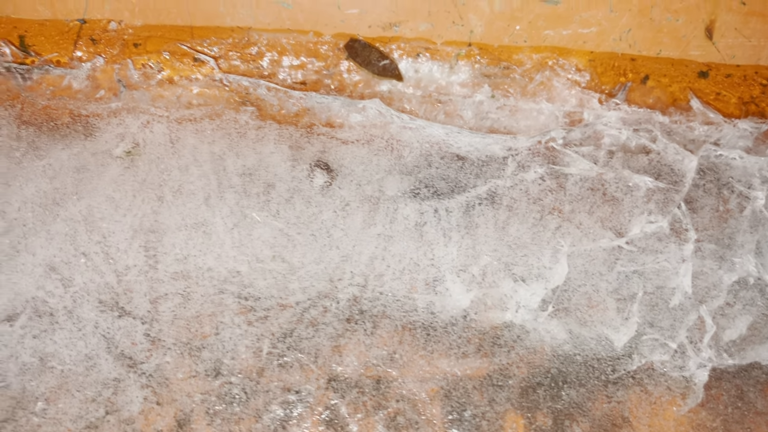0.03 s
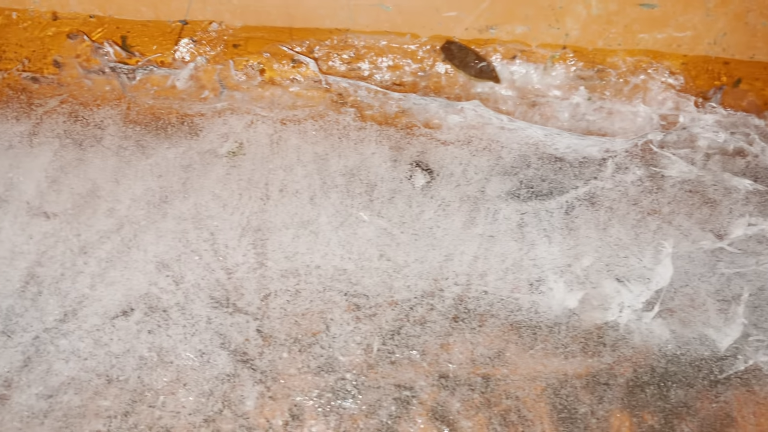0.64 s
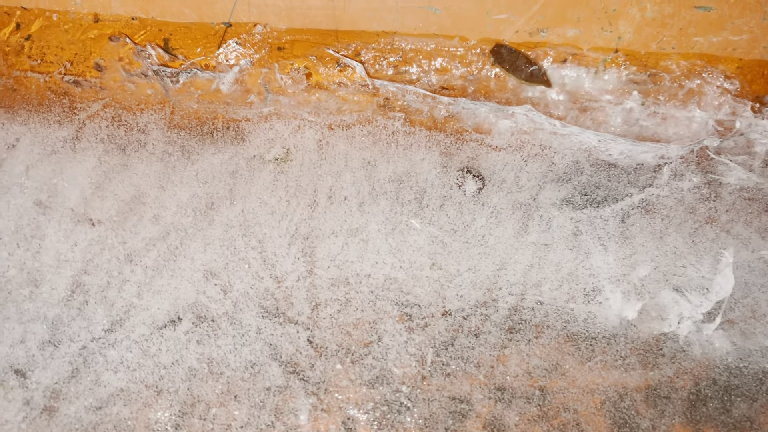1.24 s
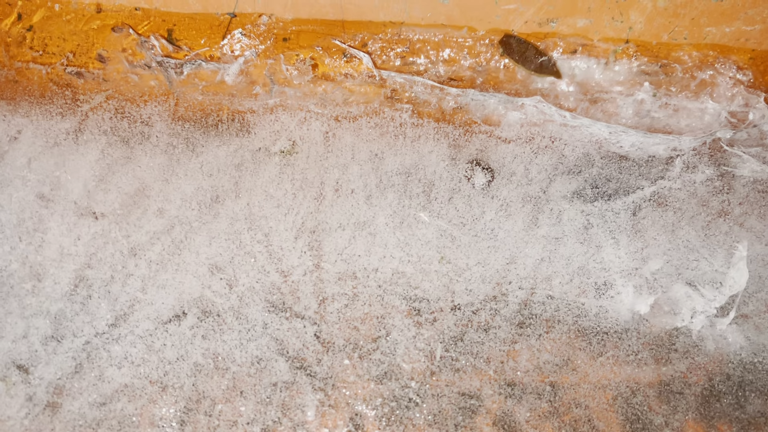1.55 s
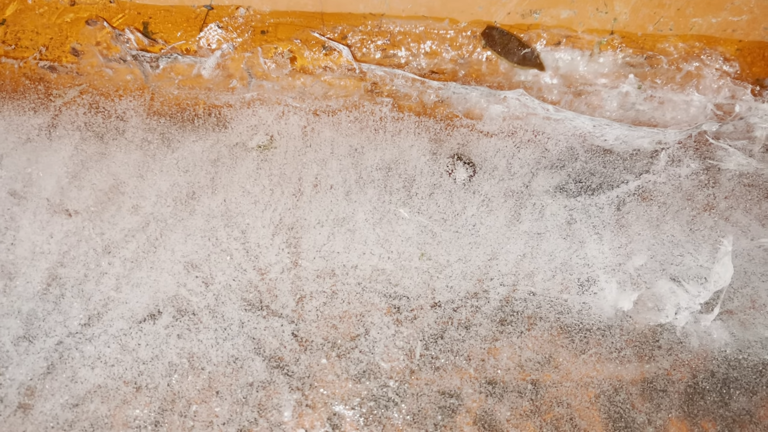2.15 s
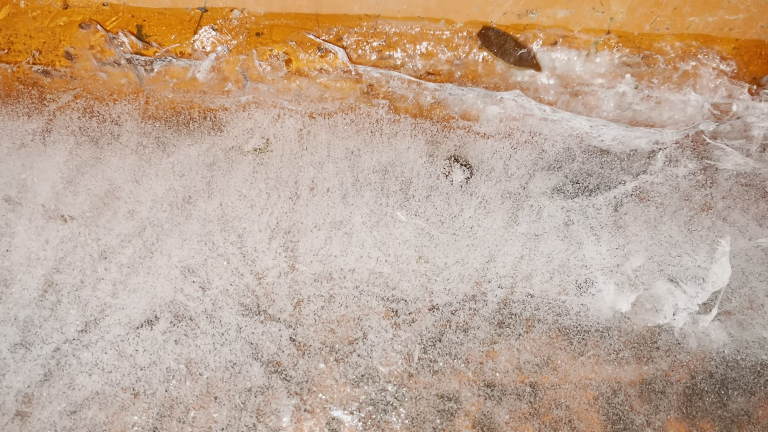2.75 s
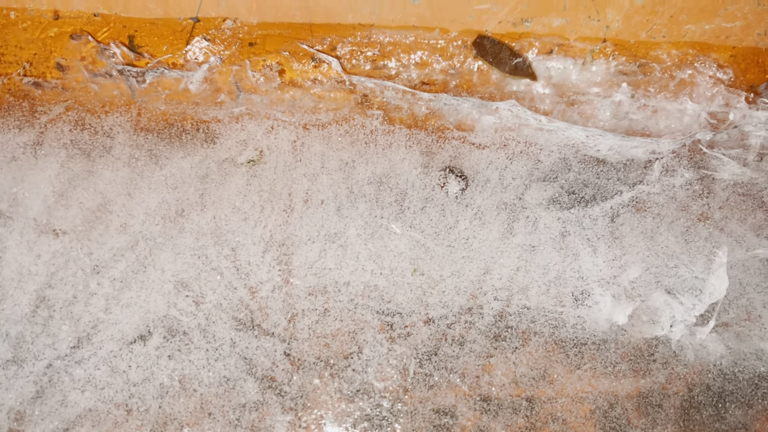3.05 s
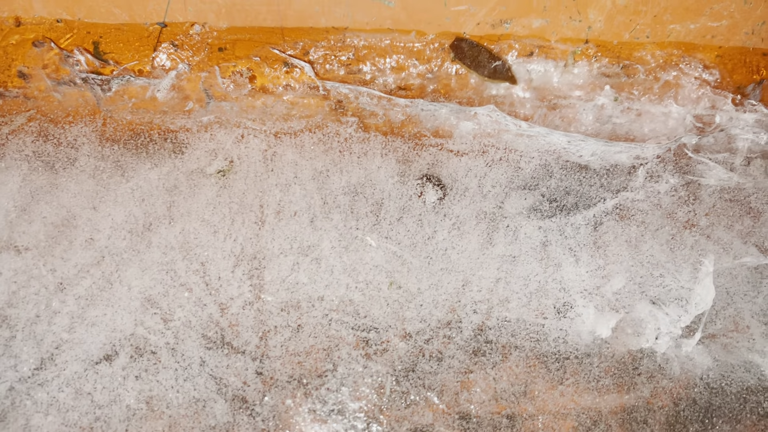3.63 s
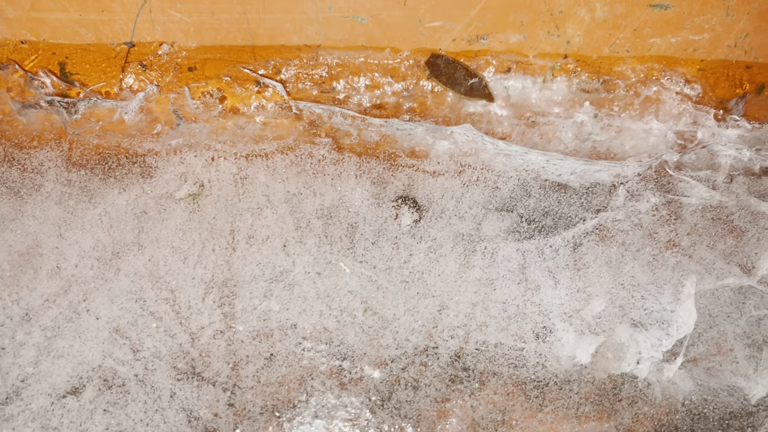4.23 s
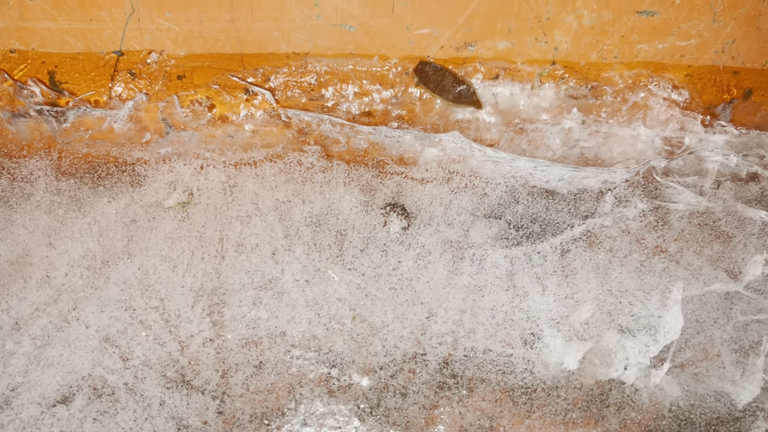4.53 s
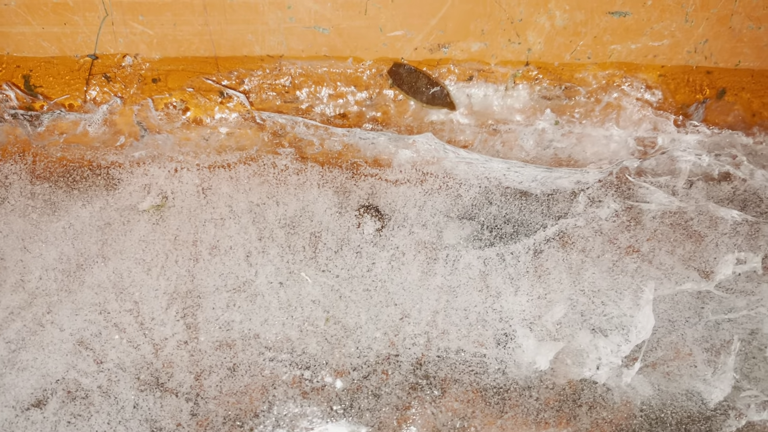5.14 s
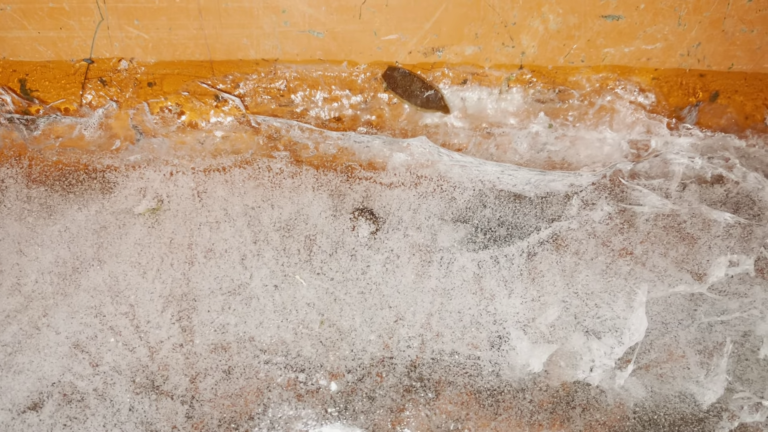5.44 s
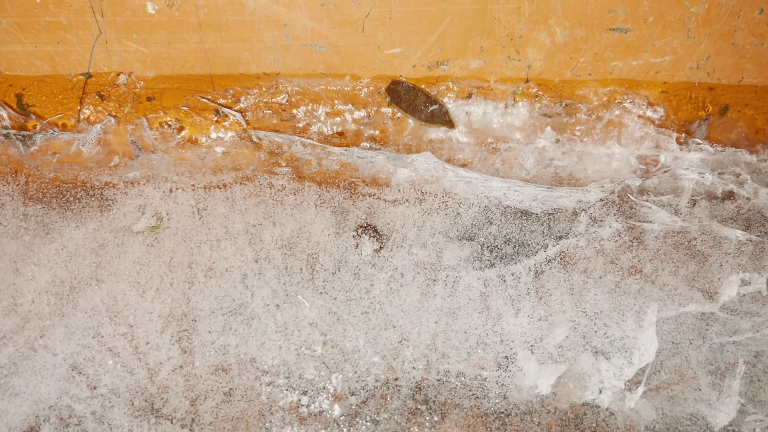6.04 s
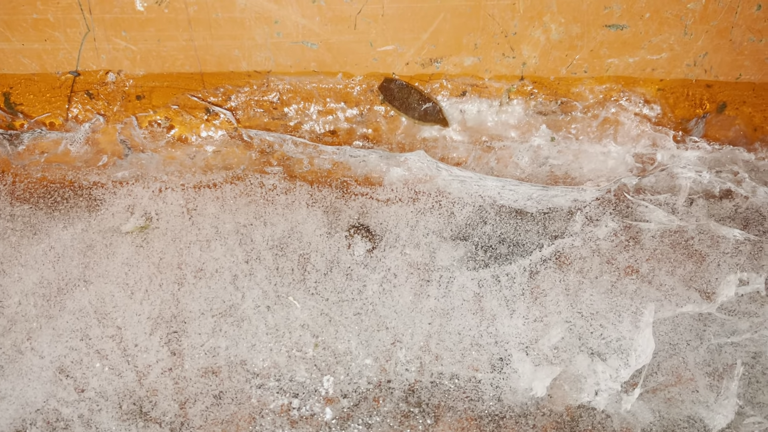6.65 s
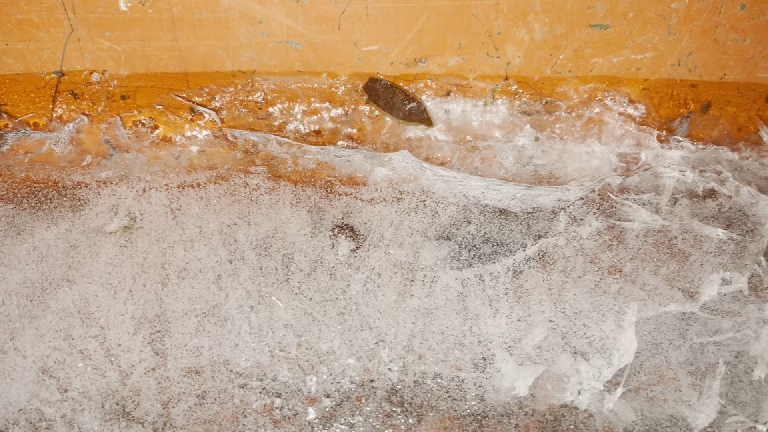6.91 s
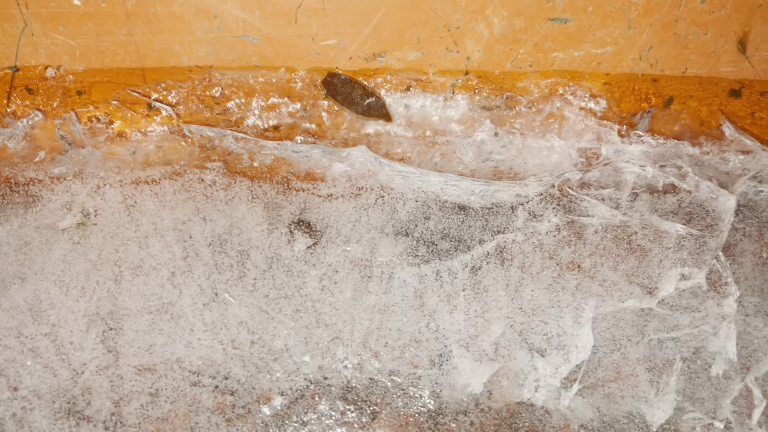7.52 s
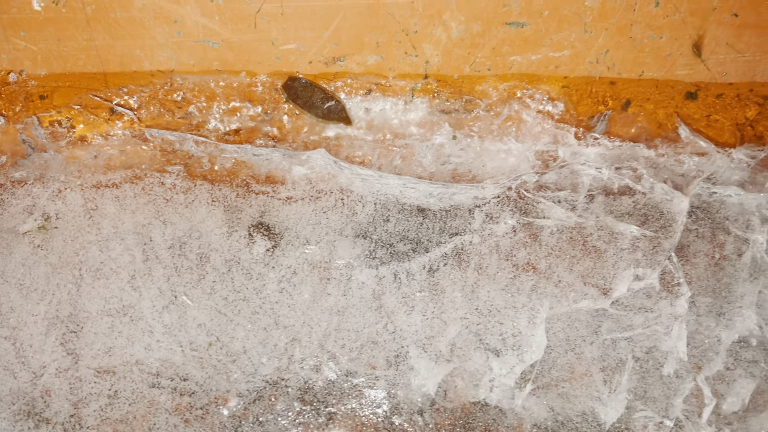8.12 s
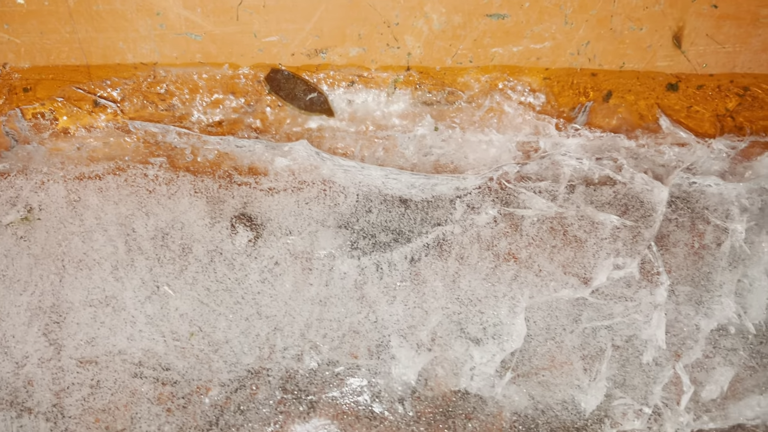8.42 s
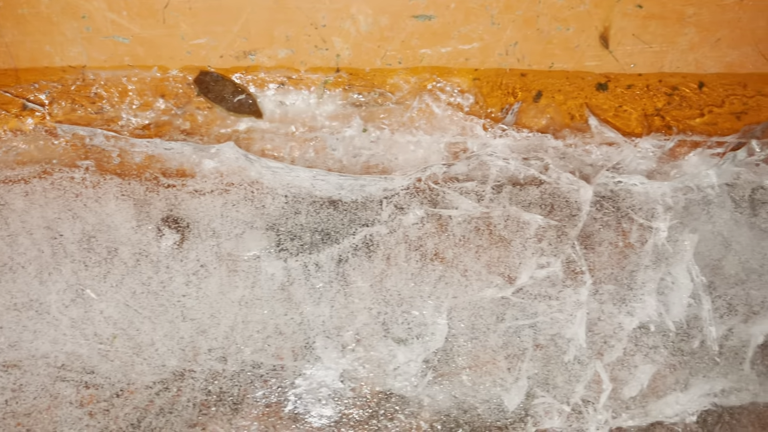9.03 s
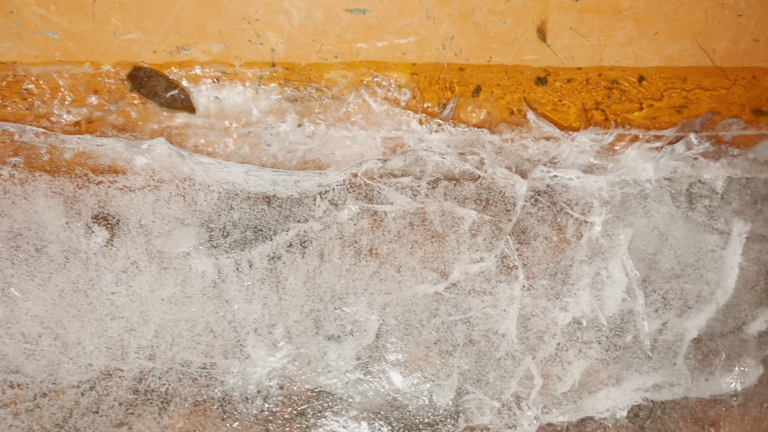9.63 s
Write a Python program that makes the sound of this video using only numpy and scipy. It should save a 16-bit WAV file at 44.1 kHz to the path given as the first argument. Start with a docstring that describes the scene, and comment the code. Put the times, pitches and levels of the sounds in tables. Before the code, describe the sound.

Ice freezing on a steel plate cracks and ticks irregularly with a short metallic ring, over a faint low rumble of distant engines.

```python
"""Outdoors, close to a painted steel plate on which ice is freezing.
Each crack is a short burst of slips that sets the plate ringing; loose flakes of frost tick without
ringing it. There is one faint rustle and a few soft, hollow knocks.
Far away, engines drone and a machine whines over the low rumble of traffic and a faint hiss."""
import sys
import numpy as np
from scipy import signal
from scipy.fft import rfft, irfft, next_fast_len
from scipy.io import wavfile
from scipy.ndimage import uniform_filter1d

SR = 44100
rng = np.random.default_rng(int(sys.argv[2]) if len(sys.argv) > 2 else 0)


def log_audio(samples):
    """Write samples as a 16-bit WAV file to the path given in sys.argv[1]."""
    # one column per channel
    frames = np.atleast_2d(samples).T
    # limit to full scale, then quantise
    limited = np.clip(frames, -1, 1)
    pcm = np.round(limited * 32767).astype(np.int16)
    wavfile.write(sys.argv[1], SR, pcm)


N = 430857
TIME = np.arange(N) / SR


def from_db(db):
    """Turn decibels into a number to multiply a sound by."""
    return 10 ** (np.asarray(db) / 20)


def unit_power(x):
    """Scale a sound so that its average power is 1."""
    return x / np.sqrt(np.mean(x ** 2) + 1e-20)


def over_time(points):
    """Join (time, value) points with straight lines, giving one value per sample."""
    return np.interp(TIME, *np.transpose(points))


def at_hz(points, hz):
    """Read between (frequency, value) points, with all octaves equally wide."""
    known_hz, values = np.transpose(points)
    return np.interp(np.log(hz), np.log(known_hz), values)


def ramp(start_s, length_s):
    """Rise evenly from 0 to 1."""
    return np.clip((TIME - start_s) / length_s, 0, 1)


def swell(start_s, rise_s, hold_s, fall_s):
    """Fade in, hold, then fade out."""
    return ramp(start_s, rise_s) * (1 - ramp(start_s + rise_s + hold_s, fall_s))


def add(out, start_s, sound):
    """Mix a sound in at the given time."""
    i = int(start_s * SR)
    out[:, i:i + sound.shape[1]] += sound[:, :N - i]


def band(x, low_hz, high_hz):
    """Keep the part of a sound between two frequencies."""
    edges = [low_hz, min(high_hz, .45 * SR)]
    return signal.sosfilt(signal.butter(2, edges, "band", fs=SR, output="sos"), x)


# how much louder the left side is than the right: f/Hz, level/dB
LEFT_LEAD = [(50, 1), (110, 2.5), (190, 5), (400, 1.5), (1200, 1.2), (2500, 2), (4500, 5), (8000, 2),
             (14000, -2)]
def balance(hz):
    """How strongly each side hears this frequency."""
    return from_db(at_hz(LEFT_LEAD, hz) * np.array([[.5], [-.5]]))


def stereo_noise(spectrum, likeness, size):
    """Shaped noise; likeness 1 makes left and right alike, 0 unrelated, -1 opposite."""
    hz = np.maximum(np.fft.rfftfreq(size, 1 / SR), 1)
    mid, side = rfft(rng.standard_normal((2, size)))
    alike = np.clip(at_hz(likeness, hz), -1, 1)
    pair = np.sqrt((1 + alike) / 2) * mid + np.sqrt((1 - alike) / 2) * side * [[1], [-1]]
    fade_past_ends = (np.minimum(hz / spectrum[0][0], 1) * np.minimum(spectrum[-1][0] / hz, 1)) ** 2
    return irfft(pair * balance(hz) * fade_past_ends * from_db(at_hz(spectrum, hz)), size)


# the tone of each of three background noises: f/Hz, relative level/dB
RUMBLE_TONE = [(20, -28), (30, -21.5), (45, -7), (62, 0.5), (90, 2), (140, 1), (175, -0.5), (220, -10.5),
               (300, -19.5), (500, -53.5)]
MURMUR_TONE = [(100, -21.5), (280, 0), (400, 2), (520, -12), (800, -18.5), (1300, -26.5), (2500, -43.5)]
HISS_TONE = [(500, 11.5), (1200, 5.5), (2500, 2.5), (5000, -.5), (7000, -1), (9000, 2), (11800, -2.5),
             (12800, -13.5), (14000, -39.5)]
# how alike the background is on the left and right: f/Hz, likeness
AIR_LIKENESS = [(60, 0.91), (130, 1), (250, 0.31), (500, 0.42), (1200, .45), (5000, 0.23), (8400, 0.85),
                (12000, 0.77)]
def air(rumble_db=-49.5, murmur_db=-73.0, hiss_db=-86.0):
    """Far traffic rumbles and murmurs under a faint, even hiss."""
    out = np.zeros((2, N))
    for tone, db in [(RUMBLE_TONE, rumble_db), (MURMUR_TONE, murmur_db), (HISS_TONE, hiss_db)]:
        noise = stereo_noise(tone, AIR_LIKENESS, next_fast_len(N, True))[:, :N]
        out += from_db(db) * unit_power(noise)
    return out


def hum(hz, level_db):
    """One pure note of a far engine, following a changing pitch."""
    cycles = np.cumsum(hz) / SR + rng.random()
    return np.sqrt(2) * from_db(level_db) * np.sin(2 * np.pi * cycles) * balance(np.mean(hz))


# how fast the steady engine fires: t/s, f/Hz
FIRING_RATE = [(0, 96.7), (1.2, 93.5), (3, 94.3), (5.6, 95.3), (7.2, 94.4), (9.77, 96.7)]
# how loud its lowest note is: t/s, level/dB
LOW_NOTE_LEVEL = [(0, -74.5), (1.2, -65.5), (5, -49.5), (7.4, -52), (9.77, -50.5)]
# how loud the note an octave higher is: t/s, level/dB
OCTAVE_LEVEL = [(0, -55), (.6, -66.5), (2.3, -69), (2.9, -54.5), (4.4, -52), (5, -58.5), (6.3, -46),
                (7.4, -58.5), (9.77, -64)]
def steady_engine(third_vs_octave_db=-18.5):
    """A far engine drones at 1, 2 and 3 times its firing rate; the top two notes swell together."""
    hz = over_time(FIRING_RATE)
    low_db, octave_db = over_time(LOW_NOTE_LEVEL), over_time(OCTAVE_LEVEL)
    return hum(hz, low_db) + hum(2 * hz, octave_db) + hum(3 * hz, octave_db + third_vs_octave_db)


# the plate's longest note; a "ring" time is how long a sound takes to fade by 60 dB
LONG_NOTE_HZ, LONG_RING_S = 1857, 1.6
def lingering_ring(start_db=-81):
    """The plate's longest note is still dying away at the start."""
    fade = from_db(start_db - 60 * TIME / LONG_RING_S)
    return fade * np.sin(2 * np.pi * LONG_NOTE_HZ * TIME) * balance(LONG_NOTE_HZ)


def rustle(hz=1076, octaves=.3, level_db=-86):
    """A faint, hollow rustle: a narrow band of noise that swells once."""
    edge_ratio = 2 ** (octaves / 2)
    noise = unit_power(band(rng.standard_normal((2, N)), hz / edge_ratio, hz * edge_ratio))
    return from_db(level_db) * noise * swell(start_s=.38, rise_s=.088, hold_s=.29, fall_s=.22)


# how hard a crack shakes the plate: f/Hz, level/dB for an average crack, share of its body added
CRACK_PUSH = [(1150, -12.5, 0.79), (1600, -13, 1), (3800, -5, .8), (9000, 0, 0.05)]
def push_db(hz, body_db):
    """The more body (fullness) a crack has, the harder it drives the plate's lower notes."""
    known_hz, average_db, share = np.transpose(CRACK_PUSH)
    return np.interp(np.log(hz), np.log(known_hz), average_db + share * body_db)


# the plate's crowd of weak notes, which blur into noise: f/Hz, relative level/dB
CROWD_TONE = [(250, -5), (450, -6.5), (750, -11.5), (1000, -2), (1150, 5), (1400, -2), (1800, 5),
              (2250, -2), (2650, -5), (6000, -4.5), (8700, -2.5), (11500, 4.5), (13000, -23.5),
              (14500, -45.5)]
# how alike the plate sounds on the left and right: f/Hz, likeness
PLATE_LIKENESS = [(300, .3), (650, -0.096), (1300, -0.6), (2600, 0.91), (5000, 0.89), (7000, 0.84),
                  (8400, .93), (12000, 0.6)]
# how long the plate rings: f/Hz, ring time/s
RING_TIMES = [(300, 1), (1100, 0.57), (2000, 0.35), (3500, 0.25), (6000, 0.22), (9000, 0.18),
              (12000, 0.087), (15000, .07)]
# the plate's clear notes: f/Hz, relative level/dB
CLEAR_NOTES = [(271, -16), (312, -20), (380, -21), (432, -22), (829, -21), (1108, -10), (1128, -6),
               (1581, -10), (1648, -12), (1681, -11), (1708, -11), (1857, -9), (1893, -12), (1917, -8),
               (1990, -9), (2590, -4), (2619, -6), (2650, -10), (2881, -11), (3158, -11), (3204, -12),
               (3500, -13), (3704, -12), (3802, -13), (4132, -13), (4863, -14), (5726, -15), (8660, -7),
               (8755, -6), (8876, -9)]
def plate_ring(body_db, clear_db, crowd_db=9.5, notes_db=-1.0, long_note_db=-35, rise_s=.0007):
    """After a crack the plate shakes at its own natural notes; the high ones die first."""
    size = 32768
    t = np.arange(size) / SR
    hz = np.maximum(np.fft.rfftfreq(size, 1 / SR), 1)
    crowd = rfft(stereo_noise(CROWD_TONE, PLATE_LIKENESS, size))
    crowd *= from_db(crowd_db + push_db(hz, body_db))
    centres_hz, ring_times = np.transpose(RING_TIMES)
    out = np.zeros((2, size))
    # split the crowd into bands so that each fades at its own speed
    for one_band, ring_s in zip(np.eye(len(centres_hz)), ring_times):
        share = np.interp(np.log(hz), np.log(centres_hz), one_band)
        out += irfft(crowd * share) * from_db(-60 * t / ring_s)
    notes = [(note_hz, db, .86 * at_hz(RING_TIMES, note_hz)) for note_hz, db in CLEAR_NOTES]
    for note_hz, db, ring_s in notes + [(LONG_NOTE_HZ, long_note_db, LONG_RING_S)]:
        # each crack meets the note's pattern of movement at a different spot
        chance_db = rng.normal(0, 2.5)
        strength = from_db(notes_db + clear_db + db + push_db(note_hz, body_db) + chance_db)
        phase = rng.uniform(0, 2 * np.pi) + rng.normal(0, .71, (2, 1))
        swing = np.sin(2 * np.pi * note_hz * t + phase)
        out += strength * balance(note_hz) * swing * from_db(-60 * t / ring_s)
    return out * (1 - np.exp(-t / rise_s))


def snap(body_db, rise_s=.00074, fade_s=.0019, size=1024):
    """The ice breaks in uneven slips for a few milliseconds: a bright sound straight from the ice."""
    t = np.arange(size) / SR
    low_db, middle_db = push_db([1600, 3800], body_db)
    tone = [(700, low_db - 9), (1500, low_db + 7.5), (3800, middle_db - 6.5),  # f/Hz, level/dB
            (8500, 6.5), (12000, 4.0), (13500, -15.5), (15500, -20.5)]
    slips_db = unit_power(uniform_filter1d(rng.standard_normal(size), size=16))
    burst = np.exp(-t / fade_s) * (1 - np.exp(-t / rise_s))
    return stereo_noise(tone, PLATE_LIKENESS, size) * from_db(slips_db) * burst


def hairline_cracks(per_s=.8, treble_db=-89, spread_db=4, snap_db=19):
    """Tiny, faint cracks at random moments, as extra rows for the table below."""
    draws = rng.random((round(per_s * N / SR), 2))
    return [(when * N / SR, treble_db + spread_db * (2 * size - 1), 0, snap_db) for when, size in draws]


# cracks in the ice: t/s, treble level/dB, body/dB above average, snap/dB above treble before its boost
ICE_CRACKS = [(0.396, -71.5, -4.5, 1), (0.414, -73, -8.5, 13), (0.739, -71, -13, -5), (1.303, -79, -8, 6),
              (1.6289, -57, 3, 10.5), (1.905, -82, -1.5, 11), (3.323, -76.5, -1, 14), (3.3794, -64.5, 3, 6),
              (3.596, -70, -4.5, 6), (3.881, -78.5, -4, 10), (4.1258, -73.5, -3, -3),
              (4.243, -44.5, 2.5, 6.5), (5.1994, -81.5, 3, 15.5), (5.634, -74.5, 0, 9), (5.657, -73, -5, 5),
              (5.7022, -58.5, -0.5, 10), (5.8181, -32, 13, 13.5), (5.9768, -47, -9, -2),
              (6.1353, -27.5, 3, 12.5), (6.5268, -54, -2.5, 7.5), (6.89, -70, -2, 2.5),
              (6.9556, -79, -4, 9), (7.1447, -79.5, -4, 9), (7.3065, -54.5, 2, -12.5),
              (7.3478, -54.5, 7.5, -4), (7.3845, -57.5, 1, 9), (8.5012, -60.5, -8.5, 7),
              (8.6008, -74.5, 4, 15), (9.3922, -48.5, -4.5, -3.5), (9.4385, -59.5, 9.5, 10),
              (9.52, -64, -1.5, 12.5), (9.5755, -66, -8, 6), (9.616, -66.5, 0, 7)]
def cracks(snap_boost_db=5.5, clear_db_per_db=.068):
    """Every crack snaps and rings the plate; a small one acts at one point, so single notes stand out."""
    out = np.zeros((2, N))
    loudest_db = max(row[1] for row in ICE_CRACKS)
    for start_s, db, body_db, snap_db in ICE_CRACKS + hairline_cracks():
        clear_db = clear_db_per_db * (loudest_db - db)
        add(out, start_s, from_db(db) * plate_ring(body_db, clear_db))
        add(out, start_s, from_db(db + snap_db + snap_boost_db) * snap(body_db))
    return out


def tick(hz, octaves, ring_s, stereo_width=.5, tail_db=-21.5, tail_s=.21, size=16384):
    """A quickly dying burst of noise around one pitch, with a faint tail of scattered sound."""
    t = np.arange(size) / SR
    edge_ratio = 2 ** (octaves / 2)
    low_hz, high_hz = hz / edge_ratio, hz * edge_ratio
    mid, side = rng.standard_normal((2, size))
    noise = mid + stereo_width * side * [[1], [-1]]
    fade = from_db(-60 * t / ring_s) + from_db(tail_db - 60 * t / tail_s)
    power_kept = 2 * (high_hz - low_hz) / SR
    return band(noise * fade, low_hz, high_hz) / np.sqrt(power_kept)


# dry ticks of loose frost: t/s, level/dB, f/Hz, width/octaves
FROST_TICKS = [(0.449, -68, 7500, 0.46), (0.662, -67, 6460, 0.63), (0.688, -69.5, 8100, 1),
               (1.376, -79, 9400, 0.51), (2.14, -63, 8400, 0.75), (2.494, -84, 3820, .23),
               (3.81, -84, 4800, .25), (3.85, -82, 5000, .25), (4.517, -77.5, 8520, .6),
               (4.536, -67, 775, 0.3), (4.572, -73, 890, 0.71), (4.584, -53.5, 10900, .7),
               (4.69, -51, 4940, 1.06), (4.698, -72, 1750, 0.22), (4.734, -73, 3630, .36),
               (4.97, -79, 3730, 0.12), (7.557, -77.5, 9400, .6), (7.582, -71.5, 5970, 2),
               (7.801, -76.5, 3993, .3), (8.005, -71, 9430, 0.64), (8.56, -65, 8640, 0.64)]
def frost(ring_at_1khz_s=.083, damping=.49):
    """Flakes break loose and leave the plate still; the higher the tick, the shorter it is."""
    out = np.zeros((2, N))
    for start_s, db, hz, octaves in FROST_TICKS:
        ring_s = ring_at_1khz_s * (1000 / hz) ** damping
        add(out, start_s, from_db(db) * tick(hz, octaves, ring_s))
    return out


def slowing_engine(start_s=1, start_hz=67.7, idle_hz=60, settle_s=1.0):
    """A second engine sinks towards idle, heard briefly at 2 and 3 times its firing rate."""
    hz = idle_hz + (start_hz - idle_hz) * np.exp(-np.maximum(TIME - start_s, 0) / settle_s)
    heard = swell(start_s, rise_s=.58, hold_s=.55, fall_s=.18)
    return heard * (hum(2 * hz, level_db=-50.0) + hum(3 * hz, level_db=-51.5))


def whine(hz=249.5, climb_hz_per_s=.74, level_db=-67.5):
    """A thin note fades in from a far machine that slowly gathers speed."""
    return ramp(start_s=1.6, length_s=2.2) * hum(hz + climb_hz_per_s * TIME, level_db)


# soft, hollow knocks: t/s, level/dB
SOFT_KNOCKS = [(4.953, -74.5), (5.132, -59), (8.562, -69.5)]
# the notes in each knock: f/Hz, relative level/dB, width/octaves, ring time/s
KNOCK_NOTES = [(404, -2.5, 0.53, 0.19), (1086, -0.5, 0.2, 0.08), (1650, -9, 0.29, 0.04)]
def knocks():
    """Each knock sounds the same three quickly dying notes."""
    out = np.zeros((2, N))
    for start_s, db in SOFT_KNOCKS:
        for hz, note_db, octaves, ring_s in KNOCK_NOTES:
            add(out, start_s, from_db(db + note_db) * tick(hz, octaves, ring_s))
    return out


def scene():
    """Ice and plate in front, engines and air behind."""
    near = cracks() + lingering_ring() + frost() + knocks()
    far = steady_engine() + slowing_engine() + whine() + air()
    return near + far + rustle()


# where the left microphone's opening rings: f/Hz, width/Hz
MIC_RESONANCES = [(10300, 1250), (13800, 900)]
def record(dry, cutoff_hz=16000):
    """The left microphone's opening slightly delays the pitches it rings at; both sides lose the top."""
    left, right = dry
    for hz, width_hz in MIC_RESONANCES:
        radius = np.exp(-np.pi * width_hz / SR)
        poles = [1, -2 * radius * np.cos(2 * np.pi * hz / SR), radius ** 2]
        left = signal.lfilter(poles[::-1], poles, left)  # shifts timing, keeps loudness
    low_pass = signal.ellip(10, .1, 80, cutoff_hz, fs=SR, output="sos")
    return signal.sosfilt(low_pass, [left, right])


dry = scene()
out = record(dry)
log_audio(out)
```